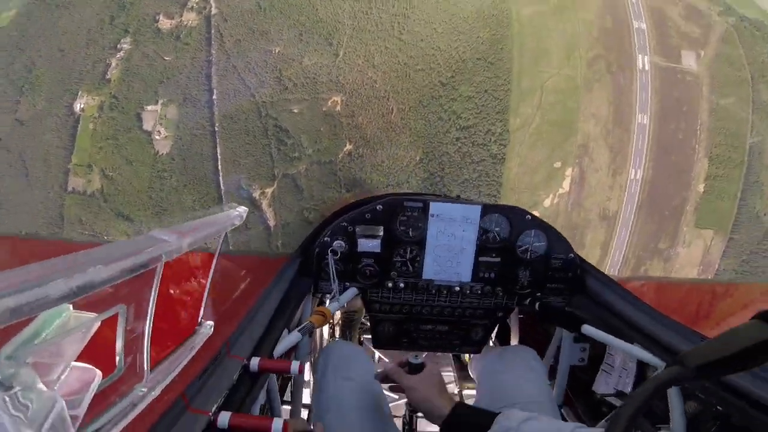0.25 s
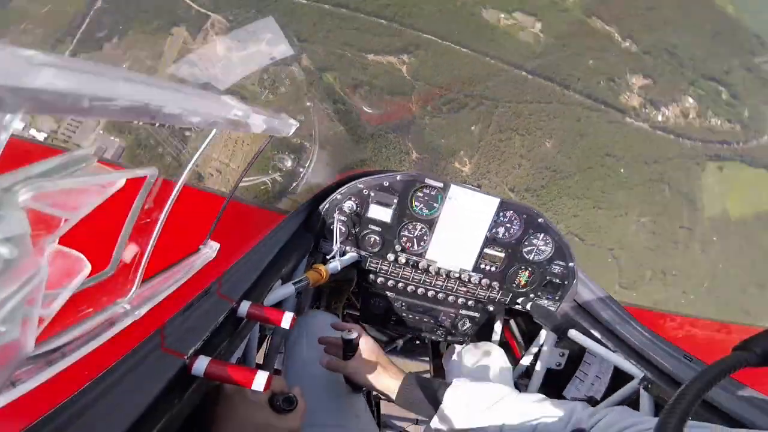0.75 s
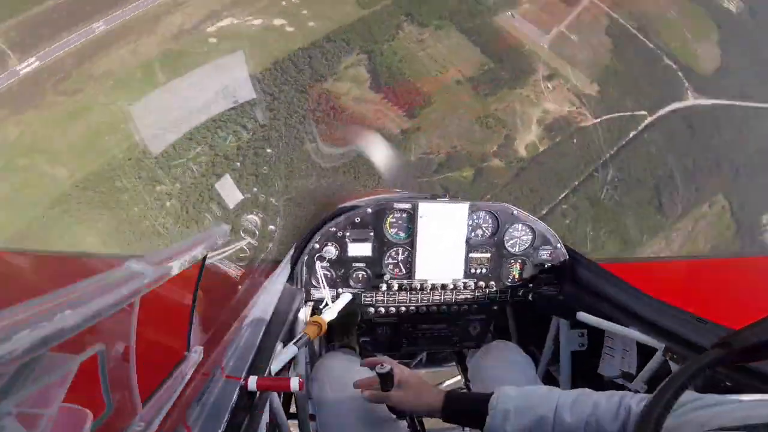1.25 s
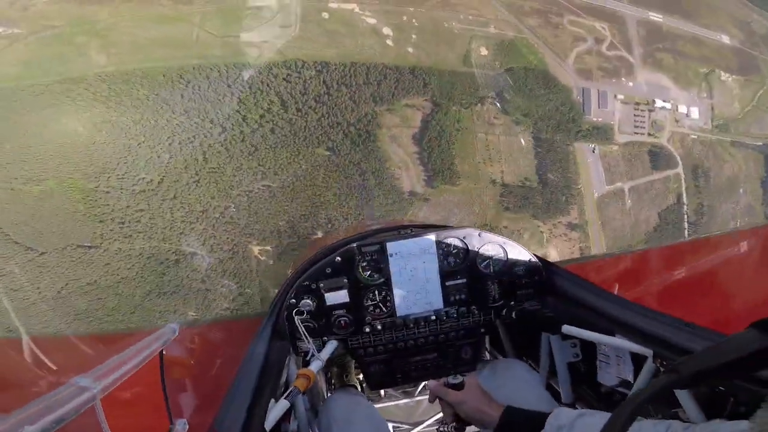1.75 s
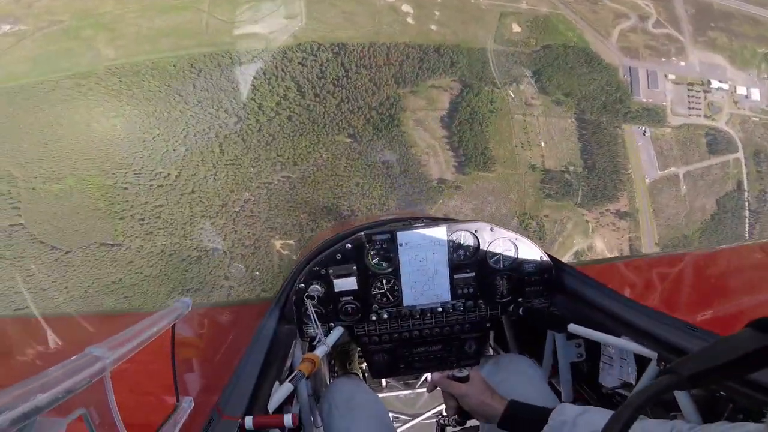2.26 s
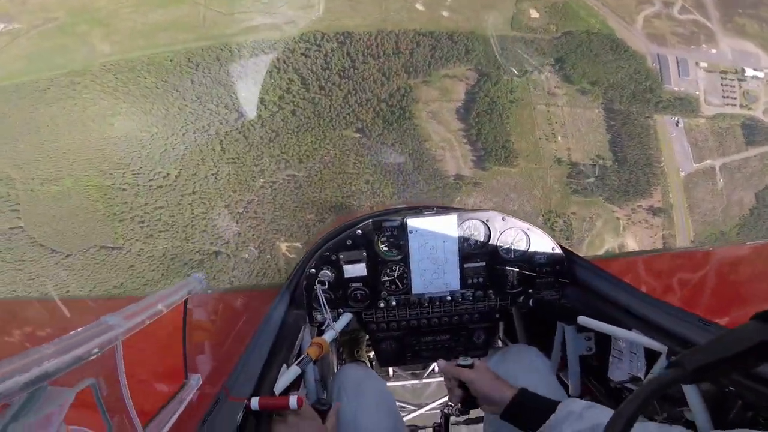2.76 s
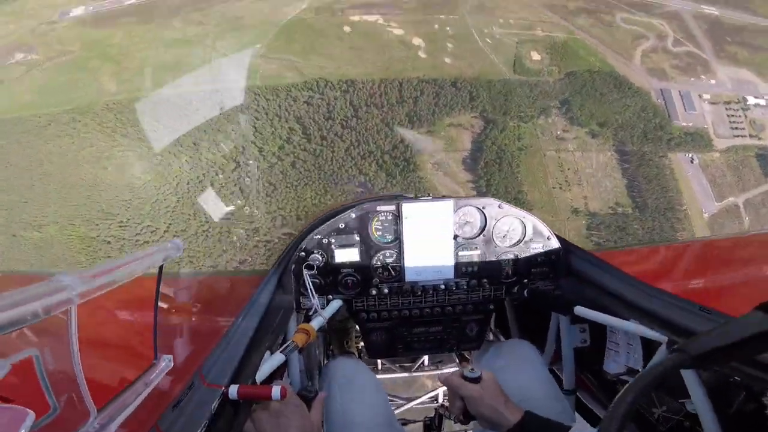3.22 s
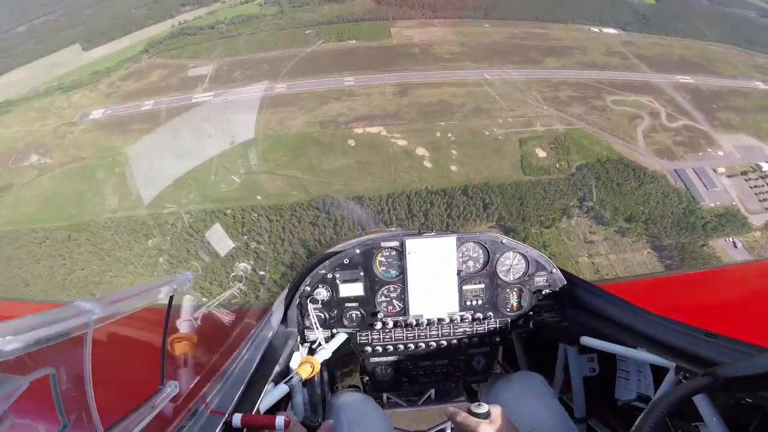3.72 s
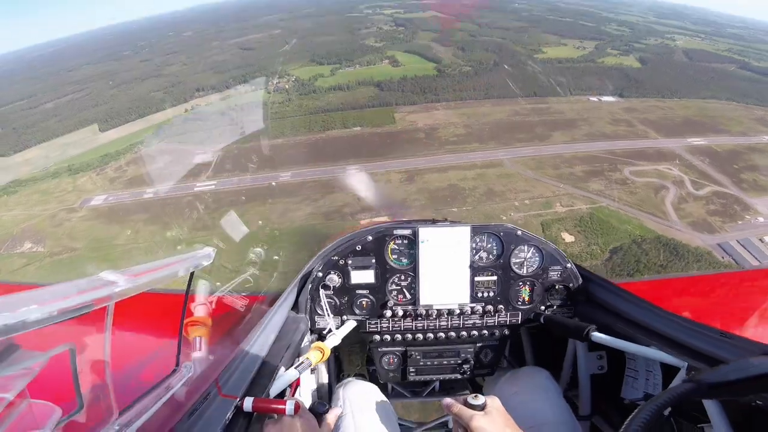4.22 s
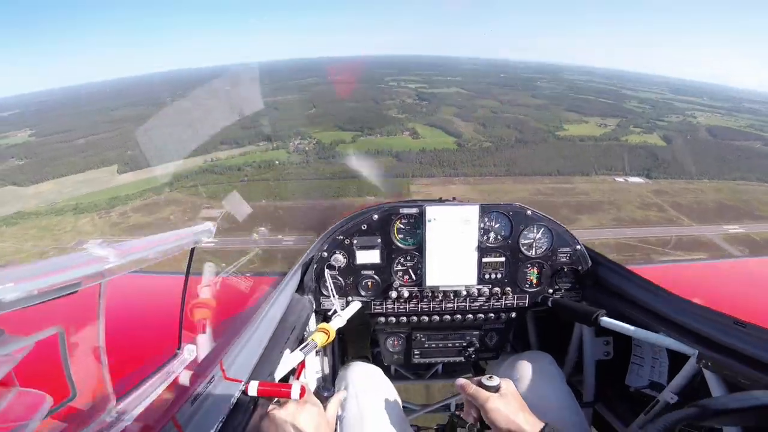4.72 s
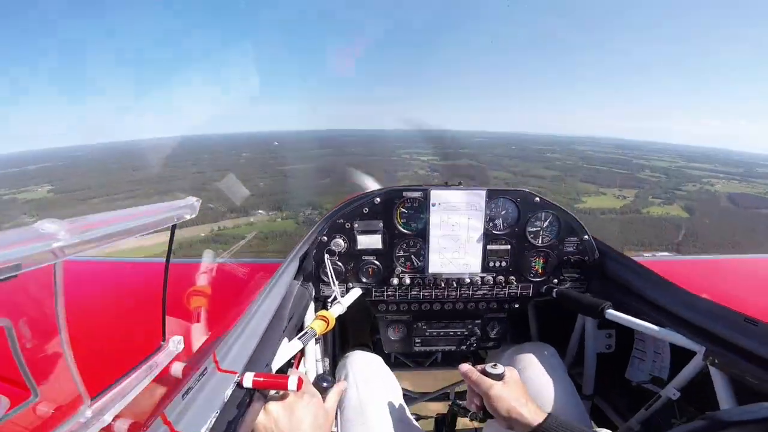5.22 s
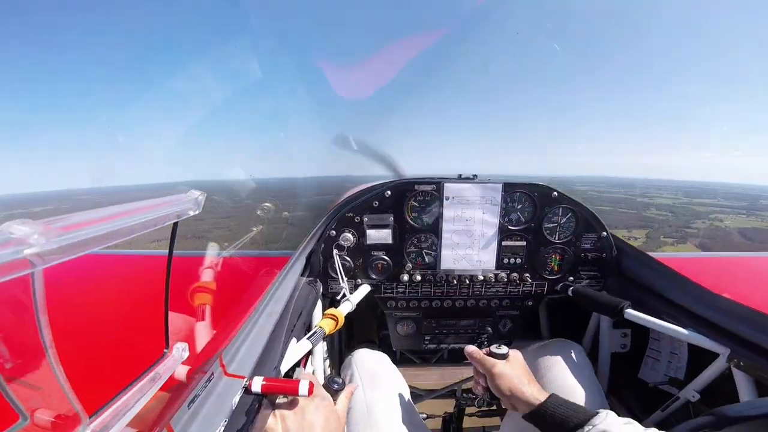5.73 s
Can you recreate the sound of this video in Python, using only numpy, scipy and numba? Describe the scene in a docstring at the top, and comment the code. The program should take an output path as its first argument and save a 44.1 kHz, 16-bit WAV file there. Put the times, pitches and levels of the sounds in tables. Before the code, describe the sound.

A small aerobatic plane's piston engine and propeller drone loudly from start to end, heard close inside the cockpit. The low buzzing note, near 120 hertz with a strong octave, stays almost level, drifting up slightly at about 0.4 and 2.8 seconds and easing back by 3.3. It is lumpy, over a dull drumming of propeller wash. At about 0.5 seconds a soft low boom of rough air disturbs the drone while roar and hiss swell; another airy swell comes near 1.1. Around 2.0 to 2.3 a stronger boom and hissing surge partly cover the tone. Hiss swells again near 2.9, and duller booms follow at 3.4 to 3.6. Wind rush and canopy ringing build steadily until about 4.3, then hold. A faint low boom passes near 5.2, and airy hiss rises again toward 5.9, ending mid-flight. Peaks are held down by the small camera.

```python
"""A six-cylinder engine and its propeller drone at governed speed in an aerobatic plane pulling out of a dive.
The drone is a stack of wavering harmonics, made lumpy by weak lines that follow the whole engine cycle.
Propeller wash, exhaust roar and short low booms shake the cabin: coloured noise that pulses or swells.
The slipstream, also coloured noise, rushes louder as speed builds and sets the canopy ringing.
Air hisses through the canopy seal and edge, swelling in slips; a limiter holds the peaks down."""
import sys
import numpy as np
from scipy import signal
from scipy.fft import rfft, irfft, next_fast_len
from scipy.io import wavfile
from scipy.ndimage import uniform_filter1d, minimum_filter1d
from numba import njit

SR = 44100
rng = np.random.default_rng(int(sys.argv[2]) if len(sys.argv) > 2 else 0)


def unload_audio(sound):
    """Save the sound as a 16-bit wav file, at the path given as the first command line argument."""
    columns = np.transpose(np.atleast_2d(sound))
    # keep every value between -1 and 1, then stretch to whole-number steps
    steps = np.round(np.clip(columns, -1, 1) * 32767)
    wavfile.write(sys.argv[1], SR, steps.astype(np.int16))


N = 263718
TIME = np.arange(N) / SR  # seconds


def undb(db):
    """Turn decibels into gain."""
    return 10 ** (np.asarray(db) / 20)


def unit(x):
    """Scale a sound to an average (rms) strength of 1."""
    return x / np.sqrt(np.mean(x ** 2))


def walk(rate):
    """Wander smoothly at random, with about rate new values a second and an rms of 1."""
    values = rng.standard_normal(8192)
    joined = np.interp(TIME * rate, np.arange(len(values)), values)
    return unit(uniform_filter1d(joined, max(int(SR / rate / 2), 1)))


def swell(middle_s, spread_s):
    """Rise and fall smoothly as a bell curve that reaches 1 in the middle."""
    return np.exp(-((TIME - middle_s) / spread_s) ** 2 / 2)


def tint(x, colour):
    """Filter a sound so each pitch gets the strength drawn by the colour's points, at rms 1."""
    pitch_hz, level_db = np.transpose(colour)
    size = next_fast_len(N)
    bin_hz = np.maximum(np.arange(size // 2 + 1) * SR / size, 1)
    gain = undb(np.interp(np.log(bin_hz), np.log(pitch_hz), level_db))
    return unit(irfft(rfft(x, size) * gain, size)[:N])


def turbulence(turns, colour, pulsing_db, flutter_db, flutter_rate):
    """Make air noise that swells once per firing and flutters as eddies pass, at rms 1."""
    swell_db = pulsing_db * np.cos(2 * np.pi * turns) + flutter_db * walk(flutter_rate)
    return tint(rng.standard_normal(N) * undb(swell_db), colour)


@njit
def resonate(x, hz, width):
    """Ring like a hollow or panel: a state-variable band-pass whose centre and width can move."""
    out, band, low = np.empty(len(x)), 0., 0.
    for i in range(len(x)):
        g, damping = np.tan(np.pi * hz[i] / SR), width[i] / hz[i]
        v = (band + g * (x[i] - low)) / (1 + g * (g + damping))
        band, low = 2 * v - band, low + 2 * g * v
        out[i] = damping * v
    return out


def ringing_noise(hz, width_hz):
    """Pass random noise through the same resonance twice, leaving a band round its pitch."""
    hz, width_hz = np.zeros(N) + hz, np.zeros(N) + width_hz
    return resonate(resonate(rng.standard_normal(N), hz, width_hz), hz, width_hz)


# Governed engine speed, joined by straight lines: time_s, firing_rate_hz
ENGINE_SPEED = [(0.0, 121.9), (0.18, 122.3), (0.44, 125), (1.1, 122.7), (1.45, 122.8), (1.7, 122),
                (2.8, 125.8), (3.3, 121.9), (4.2, 121.9), (5.1, 120.5), (5.98, 123.2)]


def engine_speed():
    """Give the firing rate in Hz and the running count of firings, which times every pulse."""
    time_s, rate_hz = np.transpose(ENGINE_SPEED)
    hz = np.interp(TIME, time_s, rate_hz)
    return hz, np.cumsum(hz) / SR


# Exhaust and blade waves briefly cancel at the octave: middle_s, depth_db
OCTAVE_FADES = [(.26, 5), (1.14, 6.5), (1.67, 6.5), (2.12, 9.5), (2.96, 4), (3.49, 6), (4.82, 4),
                (5.31, 2.5)]
# Harmonics of the firing rate, fundamental first: level_db (before the drone's lift),
# change_db_per_hz of firing rate, change_db at full airspeed, slow_fading_db, share of a gust's dip (ratio)
HARMONICS = [(-11, .35, -0.33, 0.46, 1.0), (-17.5, 0.5, 0.14, 1, 0.18), (-26, -0.7, -4, 3, .3),
             (-30.5, 0.74, -1, 1, .1), (-34, -1.0, 0.8, 1.5, .2)]


def harmonic_levels(hz, speed):
    """Shift each harmonic with engine speed and airspeed, let it wander, and change it in gusts."""
    # the drone's change is 0.57 as long as its gust
    dip_db = sum(depth_db * swell(s, 0.57 * spread_s) for s, spread_s, _, _, depth_db in GUSTS)
    levels = []
    for level_db, slope, rise_db, fading_db, share in HARMONICS:
        steady_db = level_db + slope * (hz - hz.mean()) + rise_db * speed
        levels.append(steady_db + fading_db * walk(3.515) - share * dip_db)
    levels[1] = levels[1] - sum(depth_db * swell(s, 0.11) for s, depth_db in OCTAVE_FADES)
    return levels


def drone(turns, levels_db, fundamental_lift_db=0.8, overtone_lift_db=1.3, waver_db=1):
    """Add exhaust and blade pressure waves: a firm fundamental, overtones wavering in disturbed air."""
    out = undb(levels_db[0] + fundamental_lift_db) * np.cos(2 * np.pi * turns)
    drift = 0.2 * walk(2)  # radians, shared by all overtones
    for k, level_db in enumerate(levels_db[1:], 2):
        # the cabin walls pass each higher overtone a quarter cycle later
        phase = 2 * np.pi * (k * turns - (k - 2) / 4) + (k - 1) * drift + 0.12 * walk(9)
        out = out + undb(level_db + overtone_lift_db + waver_db * walk(14)) * np.cos(phase)
    return np.sqrt(2) * out  # a cosine of rms 1


# Weak lines from unequal cylinders and the top of the exhaust note:
# multiple of the two-turn engine cycle (count), level_db
CYCLE_LINES = [(2, -40.5), (3, -33), (8, -27), (9, -32), (14, -48.5), (27, -36), (36, -47.5), (42, -41.5)]


def throb(turns, cylinders=6, waver_db=0.5):
    """Make the drone lumpy with wavering lines at multiples of the whole engine cycle's rate."""
    out = 0
    for k, level_db in CYCLE_LINES:
        phase = 2 * np.pi * (round(k) * turns / cylinders + rng.random()) + 0.5 * walk(4.024)
        out = out + undb(level_db + waver_db * walk(5)) * np.cos(phase)
    return np.sqrt(2) * out


# Each air noise below sets its level in dB from a steady strength, a change with airspeed
# and, for all but the buffeting, changes in slips.

# Colour of the propeller wash: pitch_hz, level_db (relative)
BUFFET_COLOUR = [(15, -30), (28, -13), (45, -8.5), (75, 1), (160, -1), (230, -1), (285, -3.5), (345, -0.5),
                 (480, -6), (650, -12.5), (900, -22.5), (1150, -24.5), (1500, -28), (4000, -79)]


def buffeting(turns, speed):
    """Propeller wash drums on the fuselage, hardest as each blade's wake arrives."""
    air = turbulence(turns, BUFFET_COLOUR, pulsing_db=0.35, flutter_db=0.94, flutter_rate=9.6)
    return air * undb(-18.5 + 3.5 + 1.88 * speed)


# Colour of the exhaust and wash roar: pitch_hz, level_db (relative)
ROAR_COLOUR = [(300, -12.5), (550, 5), (690, 5), (850, 0), (1100, -3.5), (1350, -11.5), (2000, -29),
               (4000, -51)]


def roar(turns, speed, spill_db):
    """The rough middle of the exhaust and wash, a quarter cycle behind each pressure peak."""
    air = turbulence(turns - 1 / 4, ROAR_COLOUR, pulsing_db=0.9, flutter_db=0.5, flutter_rate=35)
    return air * undb(-31.5 - 0.5 + 7.5 * speed + spill_db)


# Colour of the air over the canopy: pitch_hz, level_db (relative)
SLIPSTREAM_COLOUR = [(700, -26), (1250, -0.5), (1600, 2), (2100, -4.5), (2750, -5), (3300, -11.5),
                     (3900, -21.5), (4800, -30.5), (8000, -45)]


def slipstream(turns, speed, spill_db):
    """Eddies rush over the canopy, louder with airspeed, and set it ringing."""
    air = turbulence(turns - 1 / 4, SLIPSTREAM_COLOUR, pulsing_db=1.0, flutter_db=0.67, flutter_rate=60)
    flow_db = -40.5 + 10.5 * speed + spill_db
    return air * undb(flow_db - 0.63) + canopy(flow_db)


def canopy(flow_db, panel_hz=1600, width_hz=420, growth=2.25):
    """Ring noise in a canopy resonance that stands out more as the slipstream strengthens."""
    strongest_db = flow_db.max()
    ring_db = strongest_db - 6.5 + growth * (flow_db - strongest_db)
    return unit(ringing_noise(panel_hz, width_hz)) * undb(ring_db)


# Colour of the air inside the cockpit: pitch_hz, level_db (relative)
DRAUGHT_COLOUR = [(1200, -15), (2200, 4.5), (3000, 8), (3600, 2), (4300, -1), (5200, 2.5), (6000, 1),
                  (8000, -29)]


def draught(turns, speed, spill_db):
    """Air spills into the cockpit in swells as the plane slips."""
    air = turbulence(turns, DRAUGHT_COLOUR, pulsing_db=0.5, flutter_db=0.9, flutter_rate=50)
    return air * undb(-52.5 + 6.5 - 2.3 * speed + spill_db)


def seal_whistle(speed, spill_db):
    """Air rings the gap in the seal: a broad hiss that narrows and rises as airspeed builds."""
    hz = np.interp(speed ** 2, (0, 1), (5900, 6220))
    width_hz = np.interp(speed, (0, 1), (1800, 1100))  # of each of the two filter passes
    # a narrower band lets less noise through, so even out its strength
    hiss = unit(ringing_noise(hz, width_hz) / np.sqrt(width_hz))
    return hiss * undb(-51 + 0.35 + 6.6 * speed + spill_db)


# Colour of the thin canopy-edge hiss: pitch_hz, level_db (relative)
LEAK_COLOUR = [(4000, -11), (5500, -3.5), (7000, 4), (8500, 3), (10300, -1.5), (11300, -10), (12000, -17.5),
               (13000, -21), (14000, -23), (15000, -26)]


def leak(turns, speed, spill_db):
    """A thin hiss of air round the canopy edge, pulsing with the engine."""
    air = turbulence(turns, LEAK_COLOUR, pulsing_db=0.7, flutter_db=0.7, flutter_rate=75)
    return air * undb(-51 + 2.5 + 1 * speed + spill_db)


# The plane slips and air spills in: middle_s, spread_s,
# then the rise of roar_db, slipstream_db, draught_db, seal_whistle_db, leak_db
SLIPS = [(0.383, 0.12, 3, 0.15, 3, 1.2, 0.54), (1.1, .17, 1.7, -0.51, 4, 1.3, 1.5),
         (2.238, 0.25, 6, 0.56, 3.6, 3.2, 5.4), (2.893, 0.29, 1, -2.33, 3.6, 4.2, 2.2),
         (3.85, 0.35, 1.5, 0.5, 0, 1.1, 1.7), (5.9, 0.23, 3.5, 0.5, 6.5, 2.13, 1.795)]


def slip_rises():
    """Raise and lower roar, slipstream, draught, seal whistle and leak in dB in slips, one row each."""
    return sum(np.outer(rises_db, swell(s, spread_s)) for s, spread_s, *rises_db in SLIPS)


# Rough air booms in the fuselage and breaks up the drone:
# middle_s, spread_s, pitch_hz, level_db at the middle, drone_dip_db (negative lifts the drone)
GUSTS = [(.55, 0.16, 81, -20, 1.5), (0.574, 0.085, 265, -19, 6), (2.04, 0.2, 80.6, -18.5, 7.5),
         (2.14, .13, 171, -20, -1.5), (3.396, .085, 158, -15, 5), (3.548, 0.13, 74.4, -21, 4.5),
         (5.22, .1, 67.5, -25, -1)]


def gusts(width_hz=45):
    """Rough air makes short swells of low boom, each a narrow band of noise."""
    out = 0
    for s, spread_s, pitch_hz, level_db, _ in GUSTS:
        boom = unit(ringing_noise(pitch_hz, width_hz))
        out = out + boom * undb(level_db) * swell(s, spread_s)
    return out


def scene():
    """Add engine and air, all heard from one point in the cockpit."""
    hz, turns = engine_speed()
    # share of the airspeed the dive adds: builds evenly for 4.26 s, then holds
    speed = np.minimum(TIME / 4.26, 1)
    roar_rise, stream_rise, draught_rise, seal_rise, leak_rise = slip_rises()
    engine = drone(turns, harmonic_levels(hz, speed)) + throb(turns)
    wash = buffeting(turns, speed) + roar(turns, speed, roar_rise) + gusts()
    rush = slipstream(turns, speed, stream_rise) + draught(turns, speed, draught_rise)
    hiss = seal_whistle(speed, seal_rise) + leak(turns, speed, leak_rise)
    return (engine + wash + rush + hiss)[None]


def limiter(x, ceiling=0.93, hold_s=0.012):
    """Look ahead and turn the gain down smoothly round each peak that would pass the ceiling."""
    size = int(hold_s * SR)
    gain = np.minimum(1, ceiling / (np.abs(x) + 1e-9))
    return x * uniform_filter1d(minimum_filter1d(gain, size), size)


def record(dry):
    """Limit the peaks as a small camera does, then cut steeply above 14800 Hz."""
    top_cut = signal.ellip(8, 0.2, 70, 14800, fs=SR, output="sos")
    return signal.sosfilt(top_cut, limiter(dry))


dry = scene()
out = record(dry)
unload_audio(out)
```